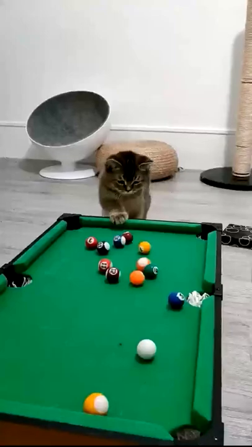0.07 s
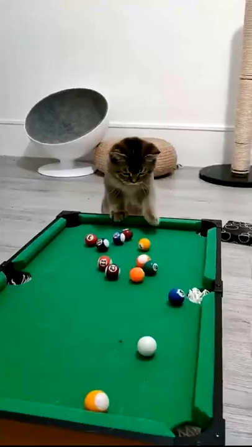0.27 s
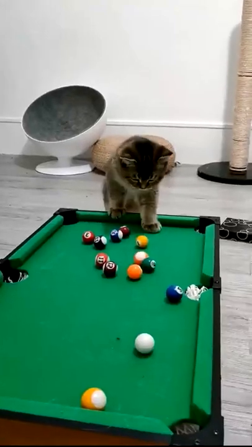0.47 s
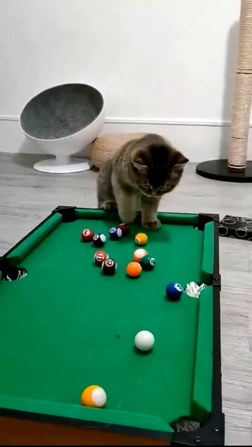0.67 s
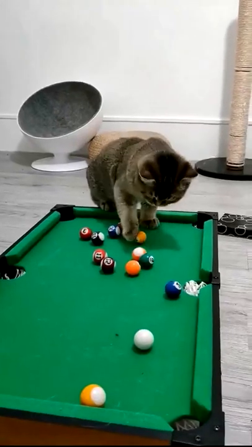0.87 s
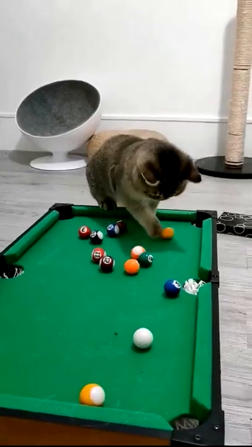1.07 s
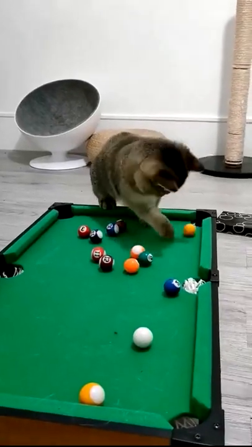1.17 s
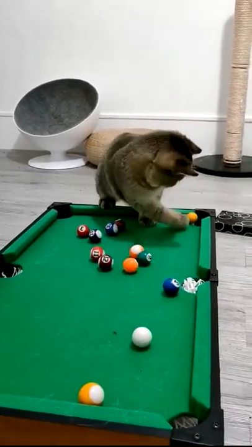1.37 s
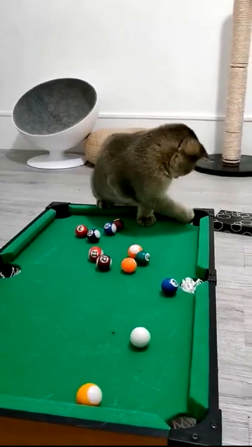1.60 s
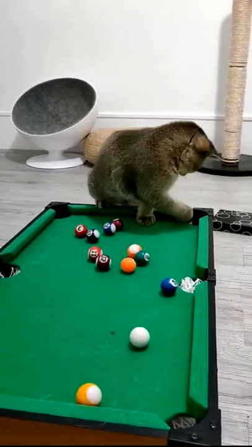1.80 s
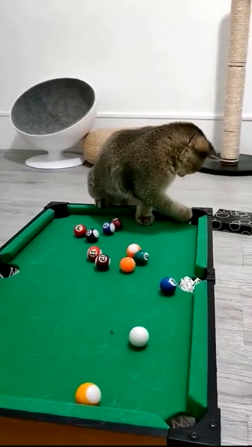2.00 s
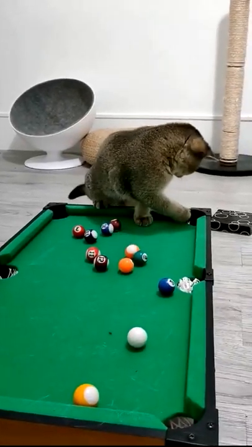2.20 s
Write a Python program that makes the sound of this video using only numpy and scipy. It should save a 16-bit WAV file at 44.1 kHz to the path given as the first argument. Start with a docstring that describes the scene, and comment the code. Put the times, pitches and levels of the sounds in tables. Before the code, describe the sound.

A small ball is sunk on a toy pool table in a quiet, humming room. A light click comes at 0.9 seconds. At 1.1 the ball clips the plastic pocket rim, drops with low knocks and rumbles along a wooden channel. A bright, ringing clack at 1.4 rattles to rest by 1.7. Light ticks, likely claws, fall between 1.3 and 2.1 seconds.

```python
"""Quiet, humming room with a toy pool table. A small ball is nudged with a click, clips a pocket's
plastic rim, drops with low knocks and rumbles along the wooden channel underneath. It ends in a bright
clack that rings the pocket, then rattles to rest. Light ticks, likely claws, fall around the clack.
Impacts are filtered pulses, damped modes and decaying noise; rolling is a stream of tiny random bumps."""
import sys
import numpy as np
from scipy import signal
from scipy.fft import rfft, irfft, next_fast_len
from scipy.io import wavfile
from scipy.ndimage import map_coordinates

SR = 44100
rng = np.random.default_rng(int(sys.argv[2]) if len(sys.argv) > 2 else 0)


def to_wav(sig):
    """Store sig (one row per channel, or 1-D mono) as 16-bit WAV at the path in sys.argv[1].

    Samples outside -1..1 are clipped; the rate is SR.
    """
    pcm = np.clip(np.atleast_2d(sig), -1, 1) * 32767
    pcm = np.round(pcm).astype(np.int16)
    wavfile.write(sys.argv[1], SR, pcm.T)  # frames by channels


N = 99225
TAIL_S = np.arange(SR * 3 // 4) / SR

# end-stop contacts (time [s], level [dB])
CLACK_HITS = [(1.352, -12), (1.3606, -7.5), (1.3645, -18), (1.382, -22), (1.392, -21)]
# end-stop spectrum (frequency [Hz], level [dB])
CLACK_COLOUR = [(30, -46), (300, 3), (900, -1.5), (1400, -20), (1850, -2.5), (2450, 5), (3300, -8.5),
                (4200, -5.5), (4900, -4.5), (5300, -10), (5800, -3.5), (6700, -12.5), (8300, -10),
                (9500, -34), (11000, -52)]
# end-stop resonances (frequency [Hz], level [dB], t60 [s])
CLACK_MODES = [(1860, 0, .5), (1962, -3, .65), (2127, 1, .85), (2190, -3, .9), (2243, 2, 1.0),
               (2330, -6, .9), (2469, -5, .75), (2731, -3, .55), (2911, 4, .5), (4820, -3, .5),
               (5750, -7, .45)]
# pocket cavity band (frequency [Hz], level [dB])
HOLLOW_COLOUR = [(30, -70), (1400, -30), (1850, -7), (2120, -1), (2250, 0), (2450, -2), (2700, -8),
                 (3100, -22), (11000, -70)]
# dry cracks of the ball (time [s], level [dB])
BALL_HITS = [(1.3523, -24), (1.3606, -2.5)]
# ball resonances (frequency [Hz], level [dB], t60 [s])
BALL_MODES = [(2170, 1, .016), (2450, -4, .014), (2750, 0, .012), (4400, -10, .012), (4900, -10, .012),
              (5780, -2.5, .016), (8100, -15, .008)]
# settling touches (time [s], level [dB])
RATTLE_HITS = [(1.392, -12), (1.4012, -10), (1.4496, -13.5), (1.463, -17), (1.476, -18), (1.51, -19),
               (1.5419, -18), (1.556, -27), (1.6117, -25), (1.6626, -24)]

# ball on wood (time [s], level [dB], pitch [ratio])
KNOCK_HITS = [(1.115, -7.5, 1.2), (1.1176, 4, 1.05), (1.1315, -10, 1.06), (1.139, -10, 1.04),
              (1.155, -9.5, 0.87), (1.1623, -6.5, 0.924), (1.174, -9.5, 1.12), (1.186, -6, 0.786),
              (1.195, -13, 0.74), (1.2195, -8.5, 0.89), (1.282, -7.5, 1.2), (1.304, -12, 0.99),
              (1.310, -10.5, 1.21), (1.3162, -3, 1.077)]
# hollow table spectrum (frequency [Hz], level [dB])
WOOD_COLOUR = [(20, -76), (60, -69), (140, -6.5), (250, -0.5), (350, -1.5), (450, -2.5), (560, 1),
               (700, -20.5), (900, -16), (1500, -47), (4000, -35), (10000, -82)]
# table resonances (frequency [Hz], level [dB], t60 [s])
WOOD_MODES = [(142, 0, .5), (208, -1, .45), (245, -7, .3), (273, -3, .4), (328, -5, .2), (361.5, 4, .4),
              (420, -8, .2), (548.5, 2, .4), (593, -6, .25), (688, 2, .3), (865, 0, .25)]
# channel floor resonances (frequency [Hz], level [dB], t60 [s])
FLOOR_MODES = [(125, -11, .12), (410, -14, .15), (530, 0, .04), (552, -12, .25)]
# rumble envelope (time [s], level [dB])
ROLL_LEVEL = [(1.07, -83), (1.09, -37), (1.11, -46), (1.135, -32), (1.2, -33), (1.25, -43.5), (1.32, -36),
              (1.39, -40.5), (1.48, -49.5), (1.7, -67)]
# scrape spectrum (frequency [Hz], level [dB])
SCRAPE_COLOUR = [(300, -25.5), (900, -0.5), (2000, 0), (3200, -1.5), (5500, -2.5), (7000, -11.5),
                 (10000, -17), (12000, -64)]
# scrape envelope (time [s], level [dB])
SCRAPE_LEVEL = [(1.07, -71), (1.09, -51), (1.15, -41.5), (1.24, -50), (1.33, -47.5), (1.45, -46.5),
                (1.66, -54), (1.76, -55), (2.04, -55), (2.12, -51), (2.25, -51.5)]

# rim contacts (time [s], level [dB])
RIM_HITS = [(1.0865, -16), (1.090, -12), (1.0945, -9), (1.098, -17)]
# plastic rim spectrum (frequency [Hz], level [dB])
RIM_COLOUR = [(30, -40), (200, -15), (700, -7), (1150, -17), (1330, -14), (1420, 0), (1580, -18),
              (1760, -14), (1880, 1), (2050, -7), (2190, 3), (2450, -14), (3000, -16), (3800, -13),
              (6000, -24), (11000, -48)]
# nudge contacts (time [s], level [dB])
NUDGE_HITS = [(0.8818, -19), (0.884, -11.5)]
# nudge resonances (frequency [Hz], level [dB], t60 [s])
NUDGE_MODES = [(1577, -11, .025), (2420, -1, .028), (3150, -5, .02), (3520, -4, .022), (3720, 0, .021),
               (4870, -9, .015), (5760, 2.5, .02), (7090, -3, .016), (8440, -13, .015)]
# light taps (time [s], tap level [dB], ping level [dB])
TICK_HITS = [(1.277, -17.5, -37), (1.565, -21.5, -29), (1.652, -22, -28), (2.077, -20.5, -20)]
# tap spectrum (frequency [Hz], level [dB])
TICK_COLOUR = [(30, -32), (500, -16), (2000, 1), (3500, 1), (4900, -8), (5650, -6), (6400, -6), (8200, -41),
               (11000, -36)]
# tap resonances (frequency [Hz], level [dB], t60 [s])
PING_MODES = [(5480, 0, 0.047), (5660, -5, .03)]

# hum lines (frequency [Hz], level [dB])
HUM_LINES = [(96.9, -2.5), (117.6, -2)]
# hum envelope (time [s], level [dB])
HUM_LEVEL = [(.2, -45), (.38, -41), (.62, -41.5), (.93, -44), (1.02, -51.5), (1.3, -44.5), (1.62, -43.5),
             (2.0, -48), (2.25, -51.5)]
# room air spectrum (frequency [Hz], level [dB])
AIR_COLOUR = [(25, -17), (50, -25.5), (63, -11.5), (78, -13), (92, -7.5), (125, -6.5), (150, -12),
              (172, -3), (190, -10), (210, -10), (290, -11), (340, -16.5), (390, -12.5), (470, -17),
              (620, -14), (800, -20.5), (1200, -26), (1900, -26), (2600, -28.5), (5800, -32.5), (7000, -35),
              (9000, -43), (10500, -45), (11500, -54.5)]
# room air envelope (time [s], level [dB])
AIR_LEVEL = [(.2, -42.5), (.5, -40.5), (.75, -42), (1.05, -40.5), (1.6, -40), (1.75, -42.5), (2.25, -43.5)]
# room decay (frequency [Hz], t60 [s])
ROOM_DECAY = [(200, 0.21), (2300, 0.4), (6000, 0.54), (10000, 0.21)]


def clack(hollow_db=-6, hollow_t60_s=1, rattle_t60_s=.1):
    """Ball hits the end of its run and rattles; the hardest contact rings the pocket."""
    out = contacts(CLACK_HITS, CLACK_COLOUR, t60_s=.011, chatter_db=9, room_db=3.5)
    hollow = impulse(HOLLOW_COLOUR)
    time_s, db = max(CLACK_HITS, key=lambda hit: hit[1])
    add(out, time_s, amp(db) * norm(through(ring(CLACK_MODES), impulse(CLACK_COLOUR))))
    add(out, time_s, amp(db + hollow_db) * norm(through(burst(hollow_t60_s), hollow)))
    for time_s, db in BALL_HITS:
        add(out, time_s, amp(db) * ring(BALL_MODES))
    for time_s, db in RATTLE_HITS:
        add(out, time_s, amp(db) * norm(through(burst(rattle_t60_s), hollow)))
    return out


def knocks(modes_db=-3, boom_db=-5.5, landing_s=1.2862, landing_db=.88):
    """Ball bounces on wood: thud, table modes, diffuse boom. The second landing rings the floor."""
    out = np.zeros(N)
    for time_s, db, ratio in KNOCK_HITS:
        thud = impulse(WOOD_COLOUR, ratio)
        add(out, time_s, amp(db) * thud)
        add(out, time_s, amp(db + modes_db) * norm(through(ring(WOOD_MODES), thud)))
        add(out, time_s, amp(db + boom_db) * norm(through(burst(t60_s=.2), thud)))
    floor_note = norm(through(ring(FLOOR_MODES), impulse(WOOD_COLOUR)))
    add(out, landing_s, amp(landing_db) * floor_note)
    return out


def rolling(bumps_per_s=1100, scrapes_per_s=3700):
    """Small bumps rumble in the wood; the surface scrapes."""
    rumble = unit(through(grains(bumps_per_s), impulse(WOOD_COLOUR)))
    scrape = unit(through(grains(scrapes_per_s), impulse(SCRAPE_COLOUR)))
    return rumble * level(ROLL_LEVEL) + scrape * level(SCRAPE_LEVEL)


def rim(gain_db=1.5):
    """Ball chatters on the pocket's plastic rim."""
    return amp(gain_db) * contacts(RIM_HITS, RIM_COLOUR, t60_s=.026, chatter_db=24, room_db=-5.5)


def nudge(crack_db=-7, room_db=-13):
    """Short pitched click as the ball is set going."""
    out = np.zeros(N)
    for time_s, db in NUDGE_HITS:
        click = ring(NUDGE_MODES) + amp(crack_db) * through(burst(t60_s=.011), impulse(TICK_COLOUR))
        reverb = amp(room_db) * through(room_tail(), click)
        add(out, time_s, amp(db) * (click + reverb))
    return out


def ticks():
    """Light taps, likely claws on the table, each with a high ping."""
    taps = [hit[:2] for hit in TICK_HITS]
    out = contacts(taps, TICK_COLOUR, t60_s=.022, chatter_db=9, room_db=-6)
    for time_s, _, ping_db in TICK_HITS:
        add(out, time_s, amp(ping_db) * ring(PING_MODES))
    return out


def hum(waver_db=1.5, drift_rad=.4):
    """Two low tones wandering in level and phase."""
    time_s = np.arange(N) / SR
    out = np.zeros(N)
    for hz, db in HUM_LINES:
        gain = amp(db + waver_db * wobble(5.43))
        phase_rad = 2 * np.pi * (hz * time_s + rng.random()) + drift_rad * wobble(5.83)
        out += gain * np.sin(phase_rad)
    return np.sqrt(2) * out * level(HUM_LEVEL)


def air():
    """Room air: near-steady coloured noise."""
    return unit(through(rng.standard_normal(N), impulse(AIR_COLOUR))) * level(AIR_LEVEL)


def contacts(hits, colour, t60_s, chatter_db, room_db):
    """Hard contacts: click, chatter and room tail through one spectrum."""
    out = np.zeros(N)
    for time_s, db in hits:
        blow = amp(chatter_db) * burst(t60_s)
        blow[0] += 1  # click
        add(out, time_s, amp(db) * (norm(blow) + amp(room_db) * room_tail()))
    return through(out, impulse(colour))


def ring(modes):
    """Damped modes of alternating sign, levels varied per strike; energy 1."""
    scatter_db = 1.5 * rng.standard_normal(len(modes))
    out = np.zeros(len(TAIL_S))
    for k, (hz, db, t60_s) in enumerate(modes):
        envelope = amp(db + scatter_db[k] - 60 * TAIL_S / t60_s)
        out += (-1) ** k * envelope * np.sin(2 * np.pi * hz * TAIL_S)
    return norm(out)


def burst(t60_s):
    """Decaying noise, energy 1."""
    return norm(rng.standard_normal(len(TAIL_S)) * amp(-60 * TAIL_S / t60_s))


def grains(per_s):
    """Tiny impacts, random in time and size."""
    return rng.standard_normal(N) * (rng.random(N) < per_s / SR)


def room_tail(size=256, onset_s=.004):
    """Random room response, decay set per frequency; energy 1."""
    hz, time_s, spectra = signal.stft(rng.standard_normal(len(TAIL_S)), SR, nperseg=size)
    decay = amp(-60 * time_s / along(ROOM_DECAY, hz)[:, None])
    tail = signal.istft(spectra * decay, SR, nperseg=size)[1][:len(TAIL_S)]
    return norm(tail * (1 - np.exp(-TAIL_S / onset_s)))


def impulse(colour, ratio=1, size=8192):
    """Minimum-phase response of a spectrum shifted by a pitch ratio; energy 1."""
    hz = np.fft.rfftfreq(size, 1 / SR)
    cepstrum = irfft(np.log(amp(along(colour, hz / ratio))))
    cepstrum[1:size // 2] *= 2
    cepstrum[size // 2 + 1:] = 0
    return norm(irfft(np.exp(rfft(cepstrum))))


def through(x, response):
    """Convolve, keeping the length of x."""
    return signal.fftconvolve(x, response)[:len(x)]


def wobble(knots_per_s):
    """Smooth random curve."""
    knots = rng.standard_normal(int(N * knots_per_s / SR) + 4)
    return map_coordinates(knots, [np.arange(N) * knots_per_s / SR])


def along(points, hz):
    """Interpolate on a log frequency axis."""
    knots_hz, values = np.transpose(points)
    return np.interp(np.log(hz + 1), np.log(knots_hz + 1), values)


def level(rows):
    """Gain per sample from (time [s], level [dB])."""
    return amp(np.interp(np.arange(N) / SR, *np.transpose(rows)))


def add(out, time_s, x):
    """Mix x into out at time_s."""
    start = int(round(time_s * SR))
    out[start:start + len(x)] += x[:len(out) - start]


def amp(db):
    """dB to gain."""
    return 10 ** (np.asarray(db) / 20)


def unit(x):
    """Scale to rms 1."""
    return x / np.sqrt(np.mean(x ** 2) + 1e-20)


def norm(x):
    """Scale to energy 1."""
    return x / (np.linalg.norm(x) + 1e-20)


def scene():
    """Mono mix at the near end of the table."""
    return (rim() + air() + hum() + nudge() + knocks() + rolling() + clack() + ticks())[None]


def record(dry):
    """Brick-wall low-pass; silence before start_s."""
    top_hz, start_s = 11700, .197
    size = next_fast_len(N + SR // 2)
    passband = np.fft.rfftfreq(size, 1 / SR) < top_hz
    filtered = irfft(rfft(dry, size) * passband, size)[..., :N]
    return filtered * (np.arange(N) / SR >= start_s)


dry = scene()
out = record(dry)
to_wav(out)
```